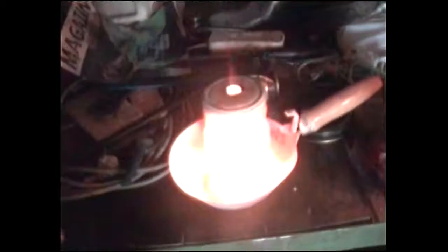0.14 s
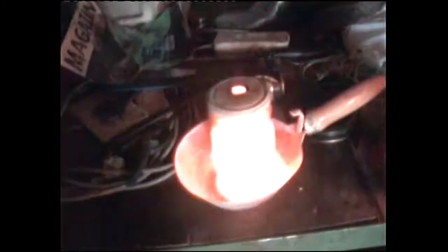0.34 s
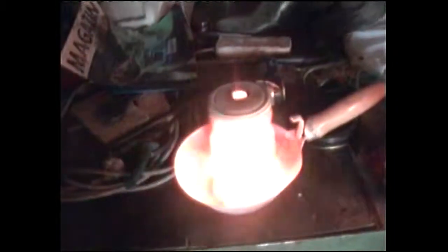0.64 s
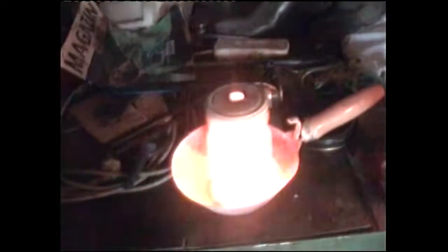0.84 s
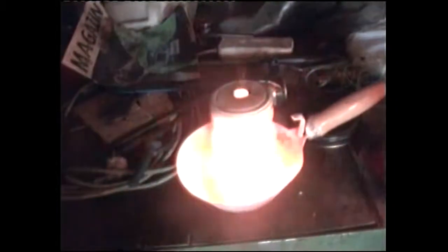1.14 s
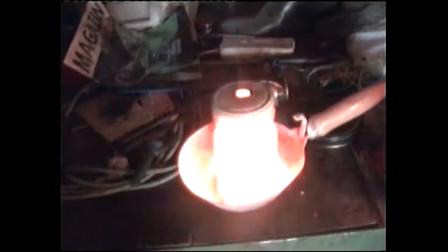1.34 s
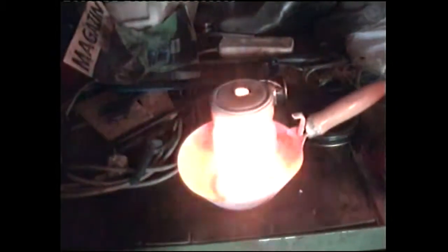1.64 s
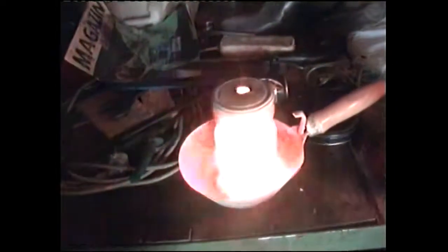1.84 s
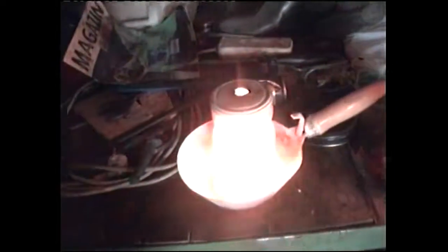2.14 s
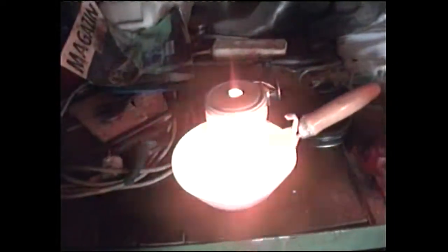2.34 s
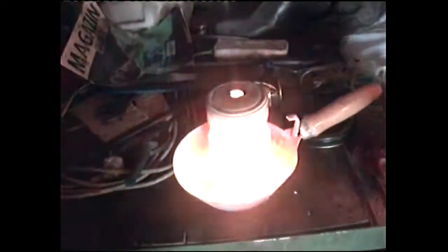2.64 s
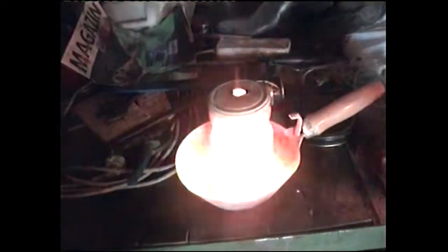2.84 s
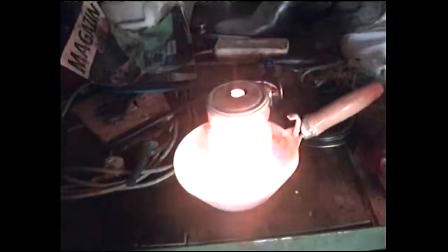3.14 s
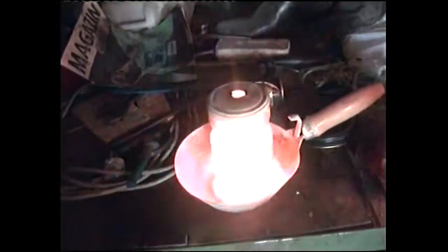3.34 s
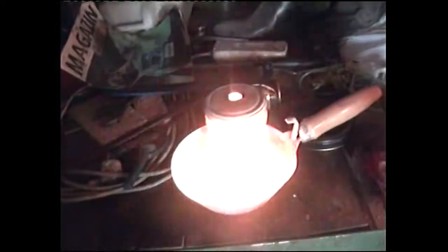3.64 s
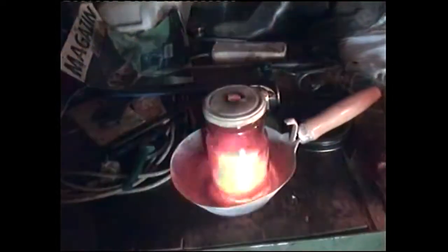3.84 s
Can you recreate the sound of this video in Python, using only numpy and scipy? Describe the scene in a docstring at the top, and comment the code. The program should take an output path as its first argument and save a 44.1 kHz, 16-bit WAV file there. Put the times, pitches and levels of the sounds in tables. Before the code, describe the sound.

Close up in a small cluttered workshop, a burning jar engine roars with low, hissing, uneven pulses, stumbles repeatedly, then cuts out near the end with soft puffs, two light ticks and a short room tail.

```python
"""A jam-jar pulse jet burning in a pan in a small, quiet workshop, heard close to the microphone.
From the start it fires about fifty times a second, surging and nearly stalling.
Each cycle is a pressure spike, a rush of hiss through the hole in the lid, a deep suction and a rebound;
jar and room ring with it, bench and walls scatter it, and the flame churns in filtered noise.
At the end the flame dies in three weak puffs, and the lid ticks twice."""
import sys
import numpy as np
from scipy import signal
from scipy.fft import rfft, irfft
from scipy.io import wavfile

SR = 44100
rng = np.random.default_rng(int(sys.argv[2]) if len(sys.argv) > 2 else 0)


def transcribe(u):
    """Save the signal u as a 16-bit wav file named by the first command-line argument.

    u: samples, shape (n,) or (channels, n), limited to [-1, 1]; the rate is SR.
    q: integer samples, one column per channel.
    """
    v = np.clip(np.atleast_2d(u).T, -1, 1)
    q = np.round(v * 32767).astype(np.int16)
    wavfile.write(sys.argv[1], SR, q)


N = 176400  # four seconds of samples

EARLY_T60_S = 0.047  # quick scatter from the clutter on the bench
ROOM_GAP_S = 0.0032  # wait before the first scattered sound


def undb(db):
    """Decibels to gain."""
    return 10 ** (np.asarray(db) / 20)


def through(x, response):
    """Play a sound through an impulse response."""
    return signal.fftconvolve(x, response)[:N]


def unit(response):
    """Scale a response to unit energy."""
    return response / np.sqrt(np.sum(response ** 2))


def colour(points, size=8192):
    """Minimum-phase response with the given (pitch_hz, level_db) curve, made by folding its cepstrum."""
    hz, db = np.array(points, float).T
    f = np.maximum(np.arange(size // 2 + 1) * SR / size, 1)
    curve_db = np.interp(np.log(f), np.log(hz), db)
    cepstrum = irfft(np.log(undb(curve_db)))
    cepstrum[1:size // 2] *= 2
    cepstrum[size // 2 + 1:] = 0
    return irfft(np.exp(rfft(cepstrum)))


def coloured_noise(swell, points):
    """Noise that follows a swell, coloured by a curve whose overall level is evened out."""
    return through(swell * rng.standard_normal(N), unit(colour(points)))


def fade(t60):
    """Half a second of exponential decay, falling 60 dB in t60 seconds."""
    return np.exp(-np.log(1000) * np.arange(SR // 2) / SR / t60)


def ring(modes):
    """Response of decaying modes, each brought to unit energy before its level is set."""
    t = np.arange(SR // 2) / SR
    response = np.zeros(len(t))
    for hz, t60, db in modes:
        response += undb(db) * unit(fade(t60) * np.cos(2 * np.pi * hz * t))
    return response


def arrival(steepness):
    """Silence for the room gap, then a ramp up to full scatter."""
    t = np.arange(SR // 2) / SR
    return np.clip((t - ROOM_GAP_S) / ROOM_GAP_S * steepness, 0, 1)


def bumps(times, widths, heights):
    """A sum of short bell-shaped swells, each cut off an eightieth of a second from its centre."""
    out, reach = np.zeros(N), np.arange(-SR // 80, SR // 80)
    at = (times[:, None] * SR).astype(int) + reach
    bell = np.exp(-.5 * ((at / SR - times[:, None]) / widths[:, None]) ** 2)
    inside = (at >= 0) * (at < N)
    np.add.at(out, np.clip(at, 0, N - 1), heights[:, None] * bell * inside)
    return out


def chance(times, count):
    """A few random values for each firing."""
    return rng.standard_normal((count, len(times)))


# colour of the quiet room, relative per Hz: (pitch_hz, level_db)
ROOM_COLOUR = [(30, -3), (69, 0), (219, -13), (600, -34), (1000, -42), (5500, -52), (14000, -68)]
ROOM_DB = -56


def quiet_room():
    """Steady noise of the workshop behind the jet, strongest in the bass."""
    return undb(ROOM_DB) * coloured_noise(np.ones(N), ROOM_COLOUR)


# firing rate of the jet: (start_s, rate_hz)
FIRING_RATE = [(0.0, 43.9), (0.07, 39.3), (0.15, 48.9), (0.33, 44.4), (0.36, 47.6), (0.43, 51.5),
               (0.49, 42.2), (0.72, 54.8), (0.8, 54.6), (0.84, 50.2), (0.9, 47.5), (0.97, 52.3),
               (0.99, 47.5), (1.2, 53.5), (1.25, 44.0), (1.43, 57.1), (1.48, 26.1), (1.53, 36.7),
               (1.63, 51.4), (1.68, 41.8), (1.79, 60.1), (1.83, 43.1), (1.92, 53.4), (1.95, 47.4),
               (2.18, 53.9), (2.22, 48.7), (2.35, 57.3), (2.39, 67.6), (2.42, 33.6), (2.45, 59.3),
               (2.48, 60.2), (2.53, 38.4), (2.58, 45.1), (2.69, 56.8), (2.75, 51.4), (2.86, 50.6),
               (2.89, 40.9), (2.97, 55.9), (3.03, 40.0), (3.18, 52.3), (3.24, 49.0), (3.27, 59.1),
               (3.32, 66.7), (3.36, 38.8), (3.54, 50.7), (3.59, 43.1), (3.7, 62.2), (3.74, 55.3)]
# strength of the burn, before each layer's own level: (start_s, thump_db, hiss_db)
BURN_STRENGTH = [(0.021, -24, -22), (0.16, -21.5, -20.5), (0.268, -25, -24.5), (0.287, -20, -21),
                 (0.311, -28.5, -34.5), (0.354, -25, -18.5), (0.475, -27, -28.5), (0.524, -24.5, -20.5),
                 (0.608, -23, -23), (0.782, -24, -18.5), (0.796, -18, -18.5), (0.835, -30, -29),
                 (0.898, -24.5, -19), (0.939, -25.5, -24.5), (1.1, -24.5, -19), (1.119, -28.5, -26),
                 (1.137, -25.5, -22), (1.261, -27, -28), (1.283, -23, -20.5), (1.304, -26.5, -28),
                 (1.362, -24, -19.5), (1.435, -22.5, -22.5), (1.491, -35, -34), (1.548, -28, -21.5),
                 (1.635, -26.5, -26), (1.675, -24.5, -19), (1.791, -24.5, -20.5), (1.836, -29.5, -28),
                 (1.855, -26.5, -25), (2.06, -24, -19), (2.154, -26, -25), (2.344, -25.5, -19.5),
                 (2.378, -25, -27), (2.413, -23, -14), (2.455, -29, -37), (2.473, -27.5, -23),
                 (2.488, -27, -33), (2.533, -33, -32.5), (2.603, -28, -24.5), (2.64, -29.5, -25.5),
                 (2.677, -24.5, -20), (2.733, -27, -25.5), (2.853, -26.5, -24), (2.894, -33, -31),
                 (2.938, -25.5, -26), (2.955, -28, -28.5), (3.17, -24.5, -20.5), (3.249, -25.5, -20),
                 (3.284, -22, -19), (3.398, -31.5, -28.5), (3.49, -27.5, -24), (3.511, -26, -31),
                 (3.528, -24, -21.5), (3.596, -31, -30), (3.634, -25.5, -18), (3.656, -25.5, -23.5),
                 (3.688, -22.5, -15.5), (3.74, -22, -27)]
# last weak puffs, before each layer's own level: (start_s, hiss_db, thump_db)
DYING_PUFFS = [(3.774, -56.5, -40), (3.818, -41.5, -44.5), (3.866, -72.5, -41)]
TIMING_SCATTER_S = .0004


def firings():
    """Time, thump dB and hiss dB of every cycle: one per whole turn of the rate, then the dying puffs."""
    rate_s, rate_hz = np.array(FIRING_RATE, float).T
    t = np.arange(N) / SR
    burning = t < rate_s[-1]
    turns = np.cumsum(np.interp(t, rate_s, rate_hz) * burning) / SR
    times = t[1:][np.diff(np.floor(turns)) > 0]
    at, thump_db, hiss_db = np.array(BURN_STRENGTH, float).T
    puff_s, puff_hiss_db, puff_thump_db = np.array(DYING_PUFFS, float).T
    scattered = times + TIMING_SCATTER_S * chance(times, count=1)[0]
    return (np.r_[puff_s, scattered],
            np.r_[puff_thump_db, np.interp(times, at, thump_db)],
            np.r_[puff_hiss_db, np.interp(times, at, hiss_db)])


# lobes of one pressure cycle: (lag_s from the firing, width_s, relative height, timing_scatter_s)
PRESSURE_LOBES = [(-.0034, 0.00053, 0.72, 0.00034), (0, 0.0024, -2.1, .0002), (.004, 0.00057, .42, 0.00081),
                  (0.0125, 0.0071, -0.33, 0.0013)]
# nearby surfaces that echo the thump: (delay_s, level_db)
NEAR_ECHOES = [(.0052, -7.5), (.0091, -15.5), (0.0153, -21)]
# low resonances of jar and room, relative: (pitch_hz, t60_s, level_db)
BODY_MODES = [(121, 0.3, -18.5), (220, 0.047, -8.5), (284.5, 0.19, -15), (413, 0.054, -22.5),
              (438, 0.079, -19)]
# colour of the whole thump: (pitch_hz, level_db)
THUMP_CURVE = [(15, -12), (30, 2), (48, -6.5), (75, -10), (98, -7), (122, -2.5), (240, 6), (345, 1),
               (400, 3), (468, 5.5), (500, -6.5), (800, 4), (2000, 2), (6000, -35.5)]
THUMP_DB, BODY_DB = 7, -16.5
LOBE_SCATTER_DB, LOBE_WIDTH_SCATTER = 1.3, .16  # width scatter is in natural-log units


def thump(times, db):
    """Spike, suction, rebound and a slow shallow dip each cycle, ringing the jar and the room."""
    pressure = np.zeros(N)
    for lag, width, height, scatter in PRESSURE_LOBES:
        late, wide, big = chance(times, count=3)
        widths = width * np.exp(LOBE_WIDTH_SCATTER * wide)
        heights = height * undb(db + THUMP_DB + LOBE_SCATTER_DB * big)
        pressure += bumps(times + lag + scatter * late, widths, heights)
    t = np.arange(N) / SR
    echoes = sum(undb(echo_db) * np.interp(t - delay, t, pressure, left=0) for delay, echo_db in NEAR_ECHOES)
    rung = undb(BODY_DB) * through(pressure, ring(BODY_MODES))
    return through(pressure + echoes + rung + workshop(pressure), colour(THUMP_CURVE))


LOW_T60_S, LOW_EARLY_DB, LOW_TAIL_DB = 0.56, -19, -13


def workshop(x):
    """Reflections of the thump: quick scatter from the clutter on the bench, then the room's tail."""
    early, tail = rng.standard_normal((2, SR // 2)) * arrival(steepness=10)
    scatter = undb(LOW_EARLY_DB) * unit(early * fade(EARLY_T60_S))
    reverb = undb(LOW_TAIL_DB) * unit(tail * fade(LOW_T60_S))
    return through(x, scatter + reverb)


# colour of the rushing gas, relative per Hz: (pitch_hz, level_db)
GAS_COLOUR = [(100, -24.5), (400, 4), (600, -1.5), (1000, 2), (1550, -2.5), (1960, 3), (2500, -0.5),
              (2850, -3.5), (3730, 0), (4200, -2.5), (4620, -8), (5100, -6), (6540, -11.5), (7500, -12.5),
              (9270, -9.5), (11800, -17), (13500, -20), (15000, -55.5)]
# colour of the sizzle, relative per Hz: (pitch_hz, level_db)
SIZZLE_CURVE = [(1500, -31), (5200, -8.5), (6500, -6.5), (7700, -0.5), (9300, -3.5), (11900, -2.5),
                (13500, -24.5), (15000, -52)]
RUSH_LEAD_S = 0.001  # the gas is fastest just before the deepest suction
RUSH_DB, RUSH_S, RUSH_SCATTER, HISS_SCATTER_DB = -7, 0.0015, 0.3, -0.66
PLUME_DB, PLUME_LAG_S, PLUME_S = -15.5, 0.0042, 0.002  # the gas breaks up above the lid after each rush
PLUME_SCATTER_DB, PLUME_LAG_SCATTER = 1.5, 0.27  # lag scatter, like rush scatter, in natural-log units
LEAK_DB, LEAK_LAG_S, LEAK_S = -30.5, 0.014, .005
SIZZLE_DB, SIZZLE_S = -17, 0.0013  # the brightest hiss comes only at the top speed of the gas


def jet(times, db):
    """Gas tears through the hole each cycle, sizzles at its fastest, breaks up in a plume and leaks softly."""
    wide, big, spill, late = chance(times, count=4)
    stretch = np.exp(RUSH_SCATTER * wide)
    peak_db = db + HISS_SCATTER_DB * big
    peak_s = times - RUSH_LEAD_S
    rush = bumps(peak_s, RUSH_S * stretch, undb(peak_db + RUSH_DB))
    sizzle = bumps(peak_s, SIZZLE_S * stretch, undb(peak_db + SIZZLE_DB))
    plume_s = peak_s + PLUME_LAG_S * np.exp(PLUME_LAG_SCATTER * late)
    plume = bumps(plume_s, PLUME_S * stretch, undb(peak_db + PLUME_DB + PLUME_SCATTER_DB * spill))
    leak = bumps(times + LEAK_LAG_S, np.full(len(times), LEAK_S), undb(db + LEAK_DB))
    flow = np.sqrt(rush ** 2 + plume ** 2 + leak ** 2)  # independent noises add by energy
    return coloured_noise(flow, GAS_COLOUR) + coloured_noise(sizzle, SIZZLE_CURVE) + diffuse(flow)


HIGH_T60_S, HIGH_EARLY_DB, HIGH_TAIL_DB = 0.26, -11, -7.5


def diffuse(flow):
    """The hiss scatters off the clutter and fills the room: a smooth wash that follows its energy."""
    arrived = arrival(steepness=2)
    early = undb(HIGH_EARLY_DB) * unit(arrived * fade(EARLY_T60_S))
    tail = undb(HIGH_TAIL_DB) * unit(arrived * fade(HIGH_T60_S))
    energy = through(flow ** 2, early ** 2 + tail ** 2)
    return coloured_noise(np.sqrt(np.maximum(energy, 0)), GAS_COLOUR)


# colour of the flame's turbulence, relative per Hz: (pitch_hz, level_db)
FLAME_COLOUR = [(35, -25.5), (70, -10), (95, -5.5), (120, 3.5), (170, 4), (255, 5), (320, -2.5), (360, -13),
                (395, -10.5), (470, -1), (500, -19.5), (1000, -44.5), (4000, -79)]
ROAR_DB, ROAR_S, ROAR_LAG_S = -5, 0.0048, 0.0051


def roar(times, db):
    """The flame churns at random while each charge burns: low noise swelling after every firing."""
    swell = bumps(times + ROAR_LAG_S, np.full(len(times), ROAR_S), undb(db + ROAR_DB))
    return coloured_noise(swell, FLAME_COLOUR)


# the lid ticks as the flame dies, before the ringing: (start_s, level_db)
LID_TICKS = [(3.772, -24), (3.862, -31)]
# ring of the lid: (pitch_hz, t60_s, level_db)
LID_MODES = [(1958, .05, -10), (2245, .18, 0), (2450, .05, -7), (3350, .16, -12), (4129, .15, -9)]
# ring of the jar under the ticking lid: (pitch_hz, t60_s, level_db)
JAR_MODES = [(320, 0.16, 3), (425, 0.079, 3)]
TICK_S, TICK_TOP_HZ = .003, 3800


def ticks():
    """Brief soft rattles, noise with its top rolled off, that set the lid and the jar ringing."""
    start_s, db = np.array(LID_TICKS, float).T
    rattle = bumps(start_s, np.full(len(start_s), TICK_S), undb(db)) * rng.standard_normal(N)
    soft = signal.sosfilt(signal.butter(4, TICK_TOP_HZ, fs=SR, output="sos"), rattle)
    return through(soft, ring(LID_MODES) + ring(JAR_MODES)) / np.sqrt(TICK_S * SR)


def pan(x, db):
    """Place a sound left of centre by a level difference between the two channels."""
    return x * undb(np.array([[db], [-db]]) / 2)


# how much of the hiss differs between the ears: (pitch_hz, level_db)
HISS_WIDTH = [(500, -17.5), (1600, -25.5), (2500, -13.5), (3500, -22.5), (4700, -11), (7000, -8.5),
              (10000, -16), (14000, -60)]


def spread(hiss):
    """Blur the hiss with fading noise and add it in opposite sign to left and right."""
    blurred = through(hiss, unit(rng.standard_normal(SR // 2) * fade(.07)))
    return through(blurred, colour(HISS_WIDTH)) * np.array([[1], [-1]])


THUMP_PAN_DB, GAS_PAN_DB = 1.78, 1.1  # left over right


def scene():
    """The jet close to the microphone, a little left of centre, over the quiet workshop."""
    room = quiet_room()
    times, thump_db, hiss_db = firings()
    low = thump(times, thump_db) + roar(times, thump_db) + room
    hiss = jet(times, hiss_db) + ticks()
    return pan(low, THUMP_PAN_DB) + pan(hiss, GAS_PAN_DB) + spread(hiss)


RUMBLE_CUT_HZ, TOP_HZ = 37, 15500


def record(dry):
    """The recorder cuts the deepest rumble and the top."""
    dry = signal.sosfiltfilt(signal.butter(4, RUMBLE_CUT_HZ, "high", fs=SR, output="sos"), dry)
    return signal.sosfilt(signal.ellip(8, .2, 70, TOP_HZ, fs=SR, output="sos"), dry)


dry = scene()
out = record(dry)
transcribe(out)
```